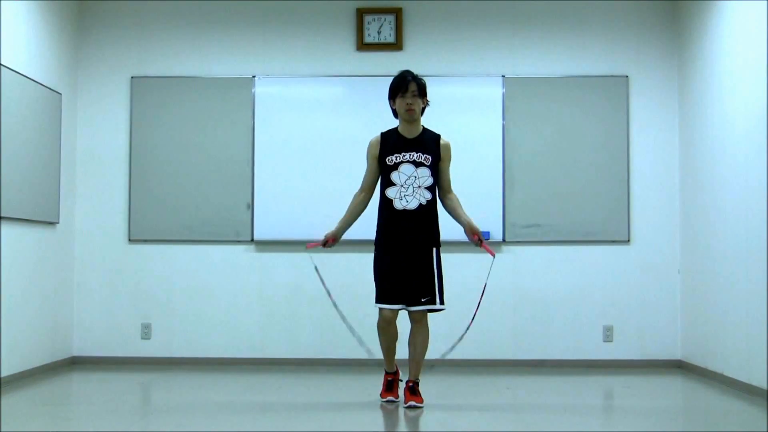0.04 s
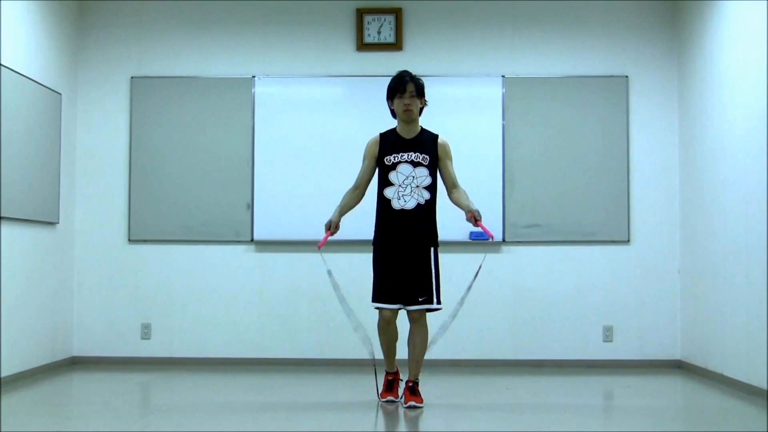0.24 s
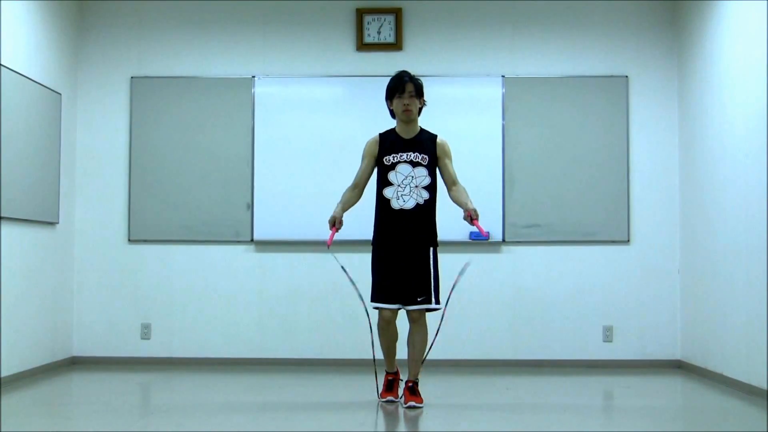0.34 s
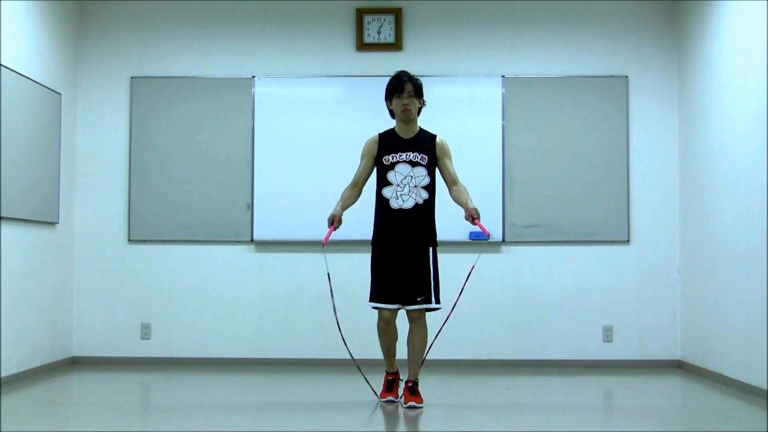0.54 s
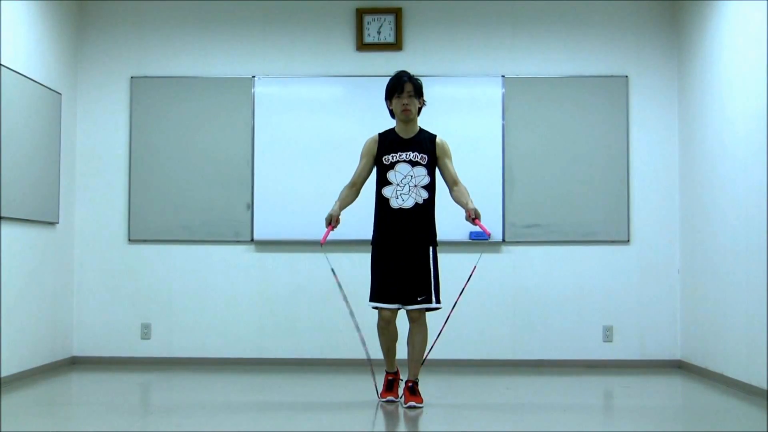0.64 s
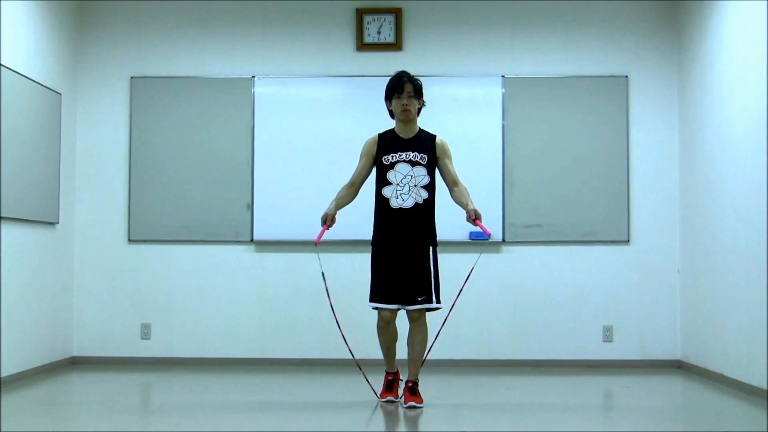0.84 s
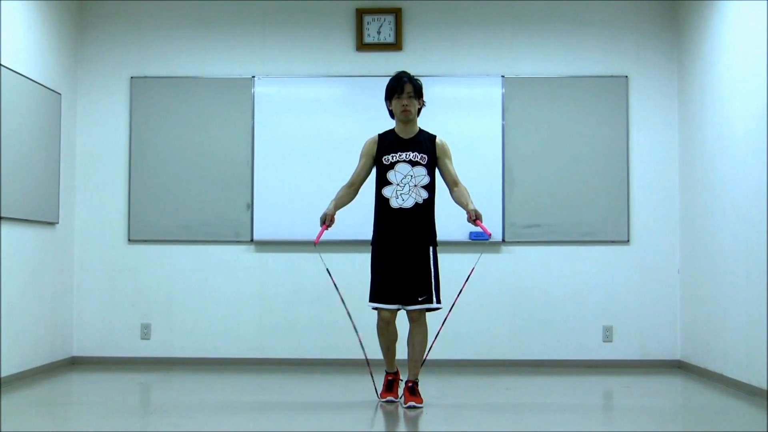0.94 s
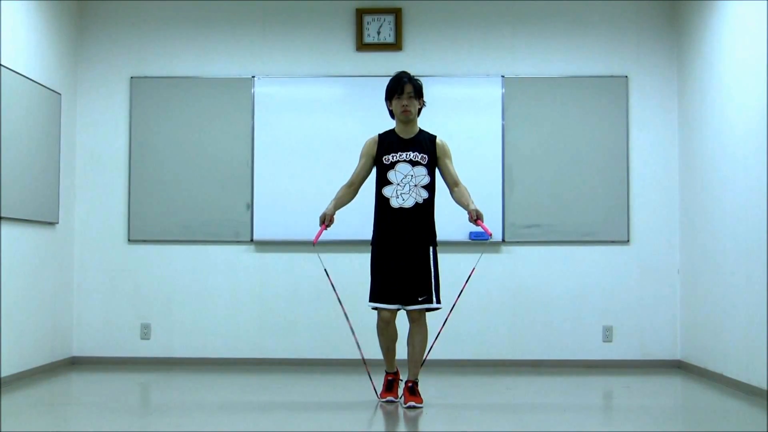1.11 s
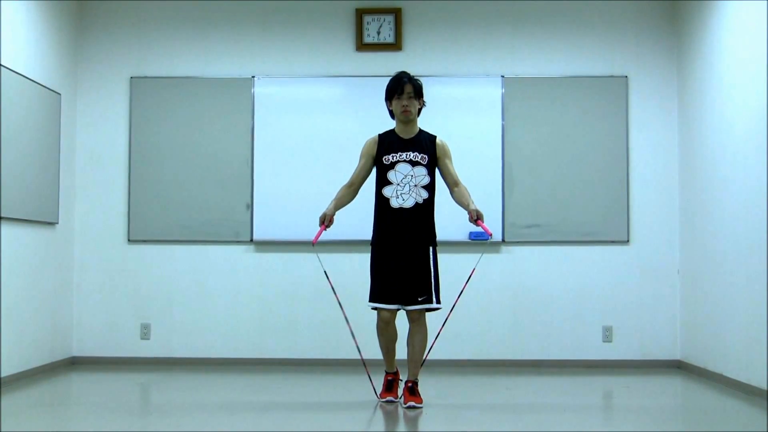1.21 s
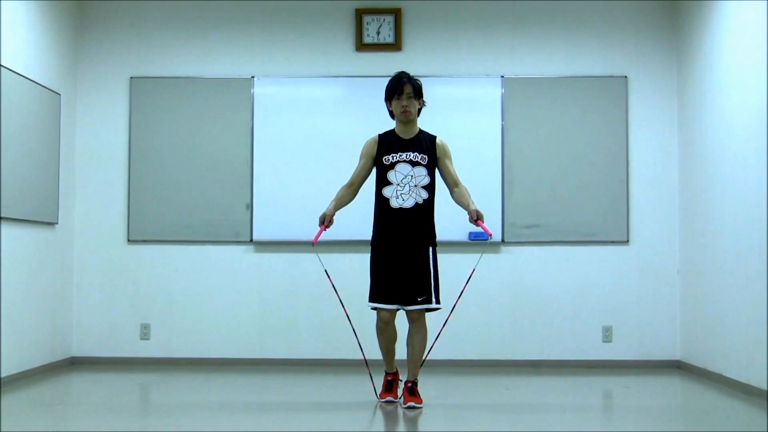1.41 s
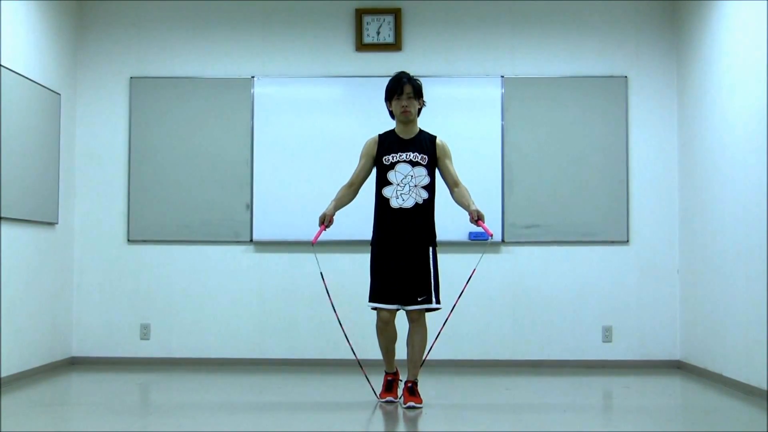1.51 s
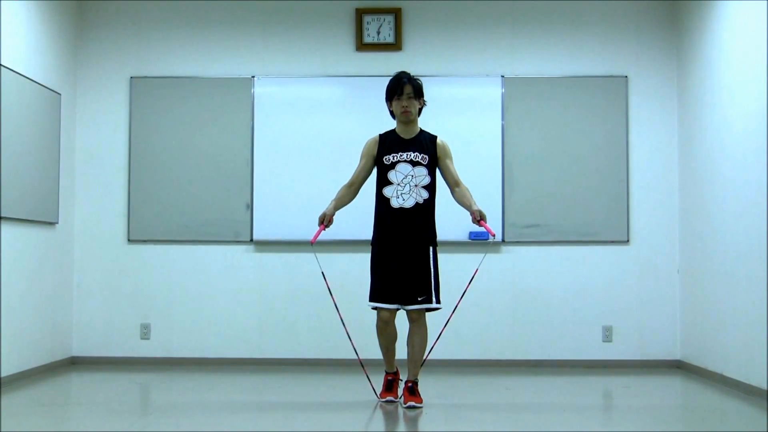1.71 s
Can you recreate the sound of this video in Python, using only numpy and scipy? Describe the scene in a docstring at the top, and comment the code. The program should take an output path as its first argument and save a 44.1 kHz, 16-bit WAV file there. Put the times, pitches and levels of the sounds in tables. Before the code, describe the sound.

A skipping rope lashes a hard floor, then shoes clap down in an echoing room.

```python
"""A sharp lash: a skipping rope whips a hard floor in a bare, bright room. Just after, shoes clap down
and the skipping stops. Each impact is a short burst that excites the cord or the sole and floor, and
the room answers with reflections and a reverberant tail. Low resonances boom while the slack rope
ticks and slides to rest. A faint, grainy wash of reverberation lingers at the start and the end,
over the hum of the ventilation."""
import sys
import numpy as np
from scipy import signal
from scipy.fft import rfft, irfft
from scipy.io import wavfile

SR = 44100
rng = np.random.default_rng(int(sys.argv[2]) if len(sys.argv) > 2 else 0)


def generate_wav(sig):
    """Save sig (samples, or channels by samples) to the path in sys.argv[1] as 16-bit PCM at SR."""
    pcm = np.round(np.clip(np.atleast_2d(sig).T, -1, 1) * 32767).astype(np.int16)
    wavfile.write(sys.argv[1], SR, pcm)


N = 77175


# Lashes of the rope and its light, bright ticks: t/s, level/dB, contact decay time/s
ROPE_LASHES = [(.2001, -9, 0.0039), (0.2034, -5.5, .005), (.2098, -2, 0.0017), (.2614, -2, 0.00038),
               (0.2723, -3.5, 0.0022), (.288, -10.5, 0.0064), (.422, -17, 0.0079)]
ROPE_TICKS = [(.357, -11.5, .0006), (.425, -39, .003), (.549, -27, .012), (.563, -26.5, .012),
              (.688, -29, .014)]
# Their spectra: f/Hz, level/dB
LASH_SPECTRUM = [(40, -49), (80, -30.5), (125, -7.5), (220, -5.5), (330, -9), (550, -11), (820, -10),
                 (1150, -3), (1700, -5), (2400, -3), (3200, 0.5), (4200, -3.5), (5200, -3), (7000, -6.5),
                 (9400, -17), (16000, -24)]
TICK_SPECTRUM = [(100, 4), (2000, -10), (6000, 5.5), (11000, -3), (14000, -6), (16000, -12)]

def rope():
    """Impact excitation: the cord slaps down along its length, rebounds and ticks."""
    lashes = amp(11.5) * impacts(ROPE_LASHES, impulse_response(LASH_SPECTRUM), direct_db=-8)
    ticks = impacts(ROPE_TICKS, impulse_response(TICK_SPECTRUM), direct_db=3)
    return lashes + ticks


# Soles meeting the floor: t/s, level/dB, contact decay time/s
SOLE_CLAPS = [(.2598, -7.5, .0008), (.2613, -2.5, 0.00098), (.265, -3.5, 0.0018), (.2722, 1, .003),
              (0.2836, -4, .0009), (.3123, -9.5, .0004), (.389, -14.5, 0.012), (.53, -27.5, 0.0072),
              (.903, -40, 0.0037), (1.2, -44, 0.0098)]
# Spectrum of a clap: f/Hz, level/dB
SOLE_SPECTRUM = [(40, -50), (75, -36.5), (120, -19.5), (300, -16), (450, -11.5), (600, -9), (850, -8.5),
                 (1000, -2.5), (1300, -0.5), (1780, -5), (2150, -3.5), (2600, -6), (3200, -7),
                 (5600, -13.5), (9000, -17.5), (16000, -43.5)]
# Modes of sole and floor: f/Hz, level/dB, T60/s
SOLE_MODES = [(710, -102, 0.03), (1035, -31, 0.062), (1187, -42.5, 0.1816), (1470, -59, 0.047),
              (1762, -27.5, 0.039), (2495, -46.5, 0.1), (2870, -38.5, 0.022)]

def shoes():
    """Damped modal vibration: flat soles clap on the floor with a short hollow ring."""
    t = np.arange(SR // 4) / SR
    ring = sum(amp(db - 60 * t / t60) * np.sin(2 * np.pi * hz * t) for hz, db, t60 in SOLE_MODES)
    body = highpass(ring, hz=543, order=2)
    add(body, 0, impulse_response(SOLE_SPECTRUM))
    return amp(11.5) * impacts(SOLE_CLAPS, body, direct_db=-4)


def impacts(rows, body, direct_db):
    """Convolution: each blow lands on its own spot, so its own echoes filter the body's response."""
    out = np.zeros((2, N))
    for start, db, decay_s in rows:
        for channel, sound in zip(out, room(decay_s, direct_db)):
            add(channel, start, amp(db) * sound)
    return signal.fftconvolve(out, body[None], axes=1)[:, :N]


def contact(decay_s):
    """Broadband excitation: an exponentially dying scatter of clicks, energy 1."""
    t = np.arange(SR // 20) / SR
    burst = rng.choice([-1, 1], len(t)) * np.exp(-t / decay_s)
    return burst / np.linalg.norm(burst)


# Reverberation time: f/Hz, T60/s
REVERB_TIMES = [(100, 1.6), (250, 1.1), (500, 0.84), (1000, 0.62), (2000, 0.55), (4000, 0.67), (6300, 0.64),
                (9000, 0.4), (15000, 0.58)]
# First wall reflections: delay/s, level/dB
REFLECTIONS = [(.0036, -20), (.0049, -10.5), (.0073, -12), (0.012, -15), (0.015, -32)]

def room(decay_s, direct_db):
    """Reverberation of one contact, mid and side: direct sound, reflections and a diffuse tail."""
    t = np.arange(N) / SR
    build_s, early_t60, echoes_per_s = .006, 0.16, 4000
    hz = np.fft.rfftfreq(512, 1 / SR)[:, None]
    frame_s = np.arange(N // 256 + 3) * 256 / SR
    phases = np.exp(2j * np.pi * rng.random((2, len(hz), len(frame_s))))
    absorption = amp(-60 * frame_s / at_frequency(REVERB_TIMES, hz))
    tail = signal.istft(phases * absorption, nperseg=512)[1][:, :N]
    tail[1] *= amp(1)  # wider: the late echoes come from all sides
    echoes = rng.choice([-1, 1], (2, N)) * (rng.random(N) < echoes_per_s / SR)
    early = echoes * amp(-60 * t / early_t60)
    build = 1 - np.exp(-t / build_s)
    out = (amp(-3) * unit(tail * build) + amp(-6) * unit(early * build)) / np.sqrt(N)
    add(out[0], 0, amp(direct_db) * contact(decay_s))
    for delay, db in REFLECTIONS:
        for channel in out:
            add(channel, delay, amp(db) * contact(decay_s))
    return out


# Low resonances: t/s, f/Hz, bandwidth/Hz, level/dB, rise time/s, T60/s
FLOOR_RESONANCES = [(0.36, 71, 4.8, -47.5, 0.17, 1.84), (0.3, 146, 37, -44, 0.14, 0.81),
                    (.262, 222, 8.5, -43, 0.019, 1.0)]

def floor_boom():
    """Resonance: low modes of floor and room swell after the landing and linger."""
    out = np.zeros((2, N))
    for start, hz, width_hz, db, rise_s, t60 in FLOOR_RESONANCES:
        t = np.maximum(np.arange(N) / SR - start, 0)
        out += narrowband_noise(hz, width_hz) * (1 - np.exp(-t / rise_s)) * amp(db - 60 * t / t60)
    return out


# Slides of the slack rope: t/s, duration/s, level/dB
ROPE_SLIDES = [(.50, 0.18, -50), (.62, 0.18, -49.5), (0.724, 0.21, -55.5)]
# Their spectrum: f/Hz, level/dB
SLIDE_SPECTRUM = [(100, -26), (600, -2), (2000, 1), (4000, -1), (6300, -2), (8500, -13), (15000, -18.5)]

def sliding_rope():
    """Sliding friction: the slack cord hisses over the floor."""
    return grainy_noise(ROPE_SLIDES, SLIDE_SPECTRUM, grain_db=2)


# Washes of lingering reverberation: t/s, duration/s, level/dB
REVERB_WASHES = [(-.2, 0.88, -58), (.78, 0.45, -55)]
# Their spectrum: f/Hz, level/dB
WASH_SPECTRUM = [(60, -43), (200, 5.5), (400, 0), (1000, -6.5), (2500, -8.5), (4000, -11.5), (8000, -20.5),
                 (16000, -25)]

def lingering_reverberation():
    """Diffuse sound field: a faint, grainy wash hangs in the room at the start and the end."""
    return grainy_noise(REVERB_WASHES, WASH_SPECTRUM, grain_db=3.5)


def grainy_noise(swells, spectrum, grain_db):
    """Amplitude modulation: noise grains of random strength swell and fade in half-sine arches."""
    t = np.arange(N) / SR
    envelope = sum(amp(db) * np.sin(np.pi * np.clip((t - start) / duration, 0, 1))
                   for start, duration, db in swells)
    noise = rng.standard_normal((2, N))
    grains = unit(noise * amp(grain_db * np.minimum(rng.exponential(1, N), 5)))
    return signal.fftconvolve(envelope * grains, impulse_response(spectrum)[None], axes=1)[:, :N]


# Spectrum of the air noise: f/Hz, level/dB
AIR_SPECTRUM = [(12, 3), (28, -10.5), (48, -15), (101, -14.5), (146, -10.5), (177, -17), (241, -10.5),
                (410, -17), (499, -14), (700, -19), (1760, -23.5), (2200, -27), (4060, -32), (16000, -40.5)]
# Low tone, a lingering room ring at first, then wavering hum: t/s, level/dB
LOW_TONE_ENVELOPE = [(0, -1), (.08, 6), (.2, 1), (.5, -2.5), (.85, -3), (1.051, 8.5), (1.25, 3.5),
                     (1.45, 1), (1.75, -3)]

def ventilation():
    """Broadband flow noise plus a randomly modulated low tone: room ring at first, then fan hum."""
    tone_hz, drift_hz, waver_db = 241, 4, 2.5
    air_gain = amp(at_frequency(AIR_SPECTRUM, np.fft.rfftfreq(N, 1 / SR)))
    air = irfft(rfft(rng.standard_normal((2, N))) * air_gain, N)
    drift, waver = narrowband_noise(0, width_hz=8)
    phase = 2 * np.pi * np.cumsum(tone_hz + drift_hz * drift) / SR
    tone = unit(amp(waver_db * waver) * np.sin(phase))
    tone *= amp(np.interp(np.arange(N) / SR, *np.transpose(LOW_TONE_ENVELOPE)))
    return amp(-51) * unit(air) + amp(-61.5) * np.array([tone, np.zeros(N)])  # tone in the mid only


def narrowband_noise(hz, width_hz):
    """Random excitation of one resonance: two independent wavering tones."""
    f = np.fft.rfftfreq(N, 1 / SR)
    phases = np.exp(2j * np.pi * rng.random((2, len(f))))
    return unit(irfft(phases / (1 + (2 * (f - hz) / width_hz) ** 2), N))


def impulse_response(spectrum, size=4096):
    """Minimum-phase response of energy 1 with the given spectrum."""
    log_gain = np.log(amp(at_frequency(spectrum, abs(np.fft.fftfreq(size, 1 / SR)))))
    response = np.fft.ifft(np.exp(np.conj(signal.hilbert(log_gain)))).real[:size // 2]
    return response / np.linalg.norm(response)


def highpass(x, hz, order):
    """Attenuation below a cutoff frequency."""
    return signal.sosfilt(signal.butter(order, hz, "highpass", fs=SR, output="sos"), x)


def amp(db):
    """Level to amplitude ratio."""
    return 10 ** (np.asarray(db) / 20)


def unit(x):
    """Normalisation to rms 1."""
    return x / np.sqrt(np.mean(x ** 2) + 1e-20)


def at_frequency(points, hz):
    """Interpolation on a log-frequency axis."""
    f, value = np.transpose(points)
    return np.interp(np.log(hz + 1), np.log(f + 1), value)


def add(mix, start_s, sound):
    """Superposition of a delayed sound."""
    part = mix[round(start_s * SR):][:len(sound)]
    part += sound[:len(part)]


# Left minus right: f/Hz, level difference/dB
LEVEL_DIFFERENCE = [(100, 1), (300, -1.2), (650, -2), (1400, -2), (3000, -1), (10000, 0.4)]

def stereo(mid_side, correlation):
    """Sum and difference: mid and side, weighted by correlation, become left and right."""
    hz = np.fft.rfftfreq(N, 1 / SR)
    likeness = np.clip(at_frequency(correlation, hz), -1, 1)
    lean_db = at_frequency(LEVEL_DIFFERENCE, hz) / 2
    mid, side = rfft(mid_side) * np.sqrt([(1 + likeness) / 2, (1 - likeness) / 2])
    return irfft(np.array([mid + side, mid - side]) * amp([lean_db, -lean_db]), N)


# Likeness of left and right: f/Hz, correlation
NEAR_CORRELATION = [(40, 0.56), (150, 0.76), (300, 0.92), (500, .86), (1100, 0.87), (2500, 0.56),
                    (5000, .42), (9000, .25), (15000, .15)]
BACKGROUND_CORRELATION = [(40, 0.2), (110, 0.057), (240, 0.12), (400, -0.067), (700, -0.37), (1300, -0.35),
                          (2500, -0.13), (6000, -0.12), (15000, .1)]

def scene():
    """Superposition: rope, shoes and floor against wide reverberation and ventilation."""
    near = rope() + shoes() + floor_boom() + sliding_rope()
    background = lingering_reverberation() + ventilation()
    return stereo(near, NEAR_CORRELATION) + stereo(background, BACKGROUND_CORRELATION)


def record(dry):
    """Soft saturation rounds the peaks; band limiting cuts the deepest rumble and the top treble."""
    ceiling, top_hz = 0.8, 15900
    rounded = ceiling * np.tanh(dry / ceiling)
    lowpass = signal.firwin(511, top_hz, window=("kaiser", 9), fs=SR)
    return signal.oaconvolve(highpass(rounded, hz=18, order=4), lowpass[None], "same")


dry = scene()
out = record(dry)
generate_wav(out)
```